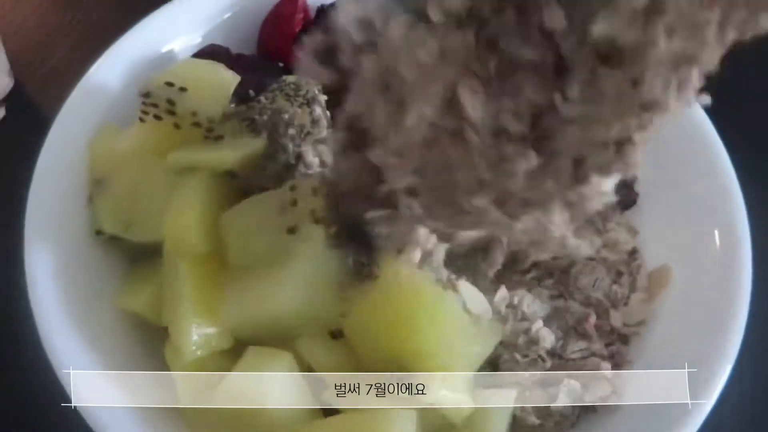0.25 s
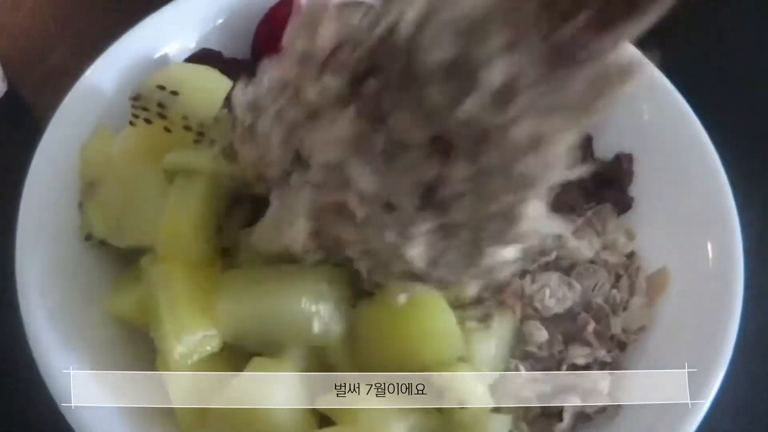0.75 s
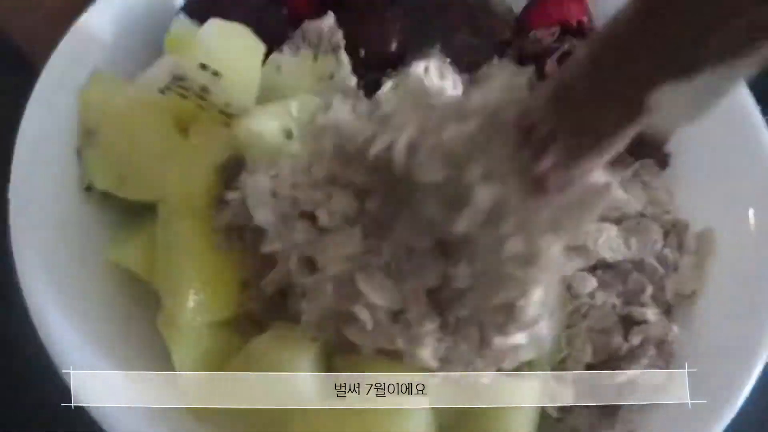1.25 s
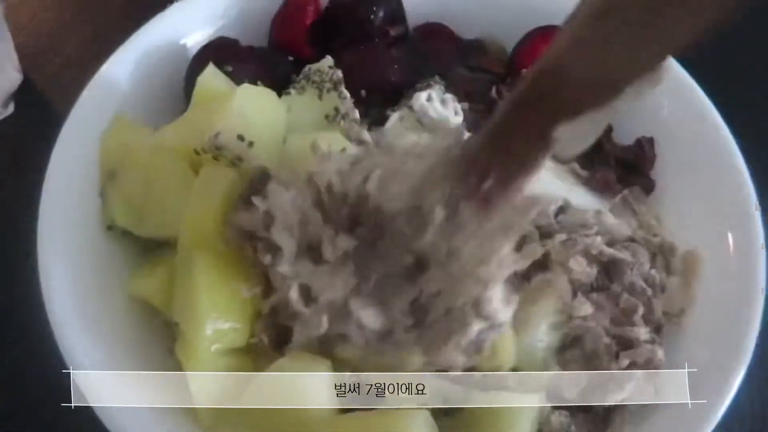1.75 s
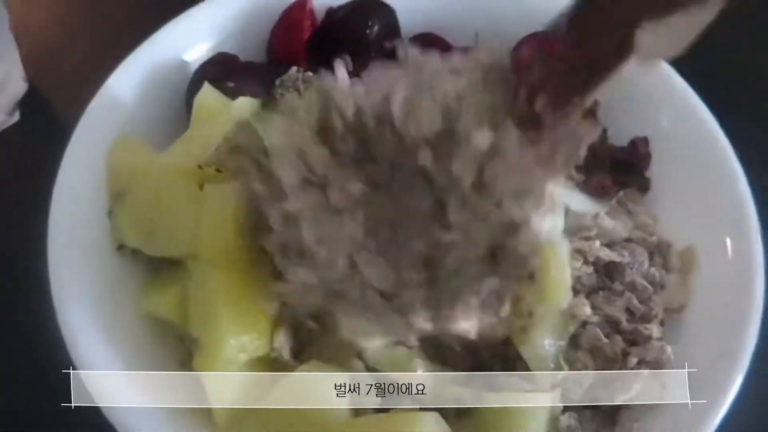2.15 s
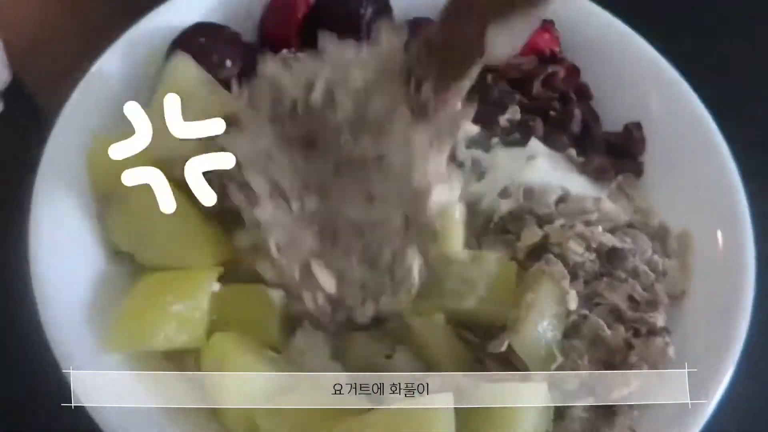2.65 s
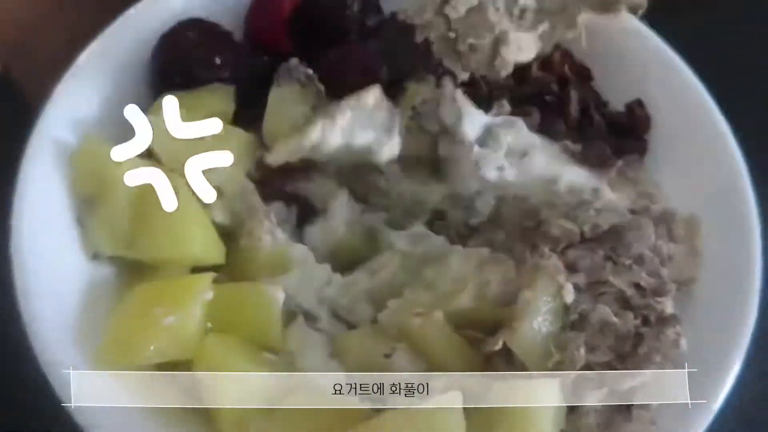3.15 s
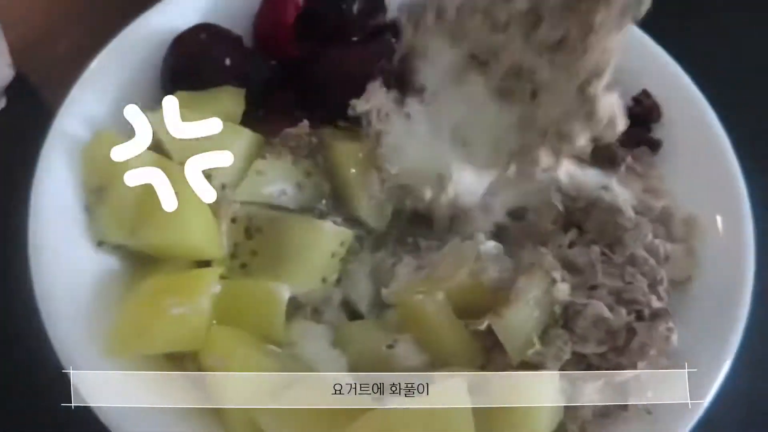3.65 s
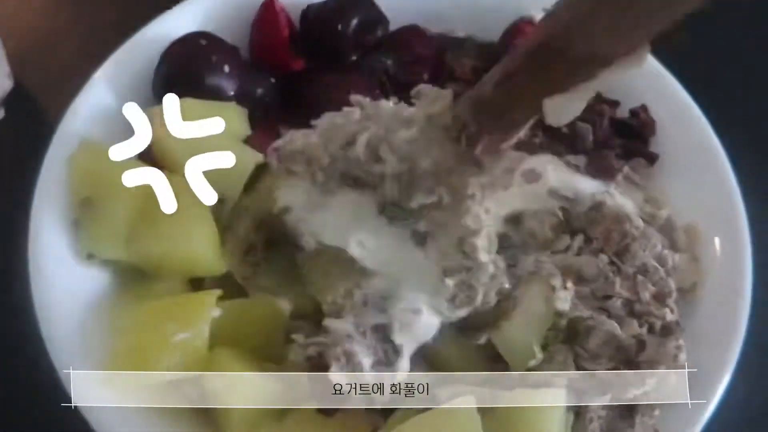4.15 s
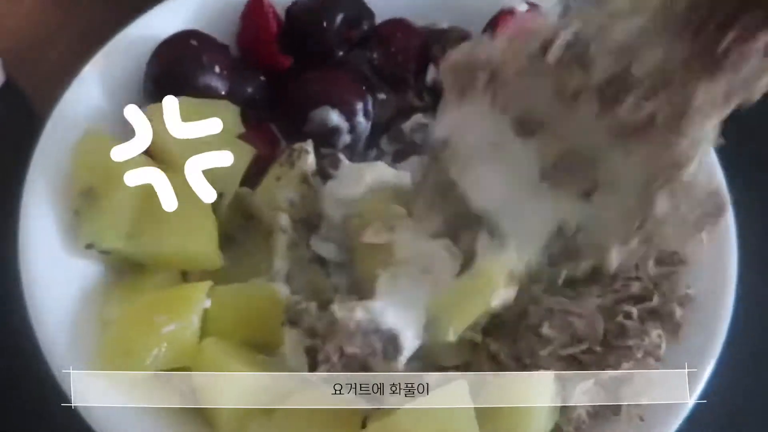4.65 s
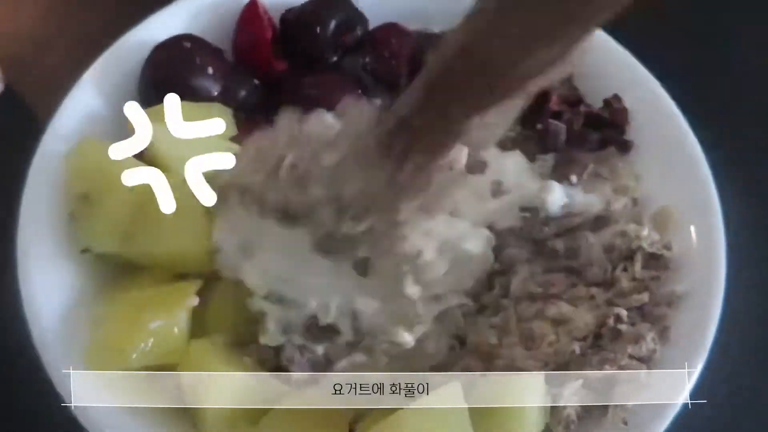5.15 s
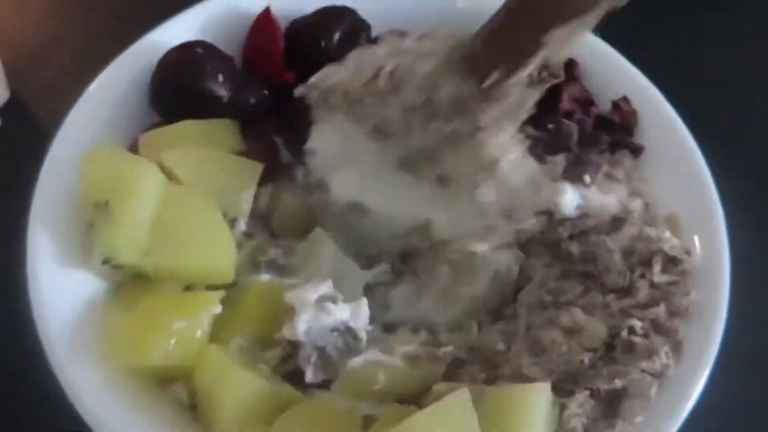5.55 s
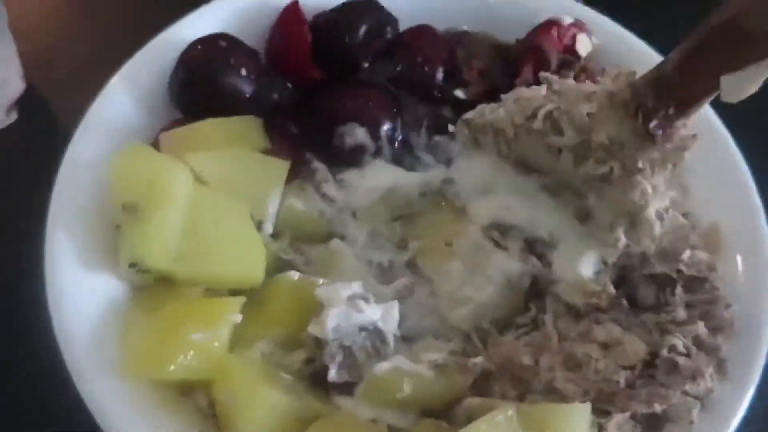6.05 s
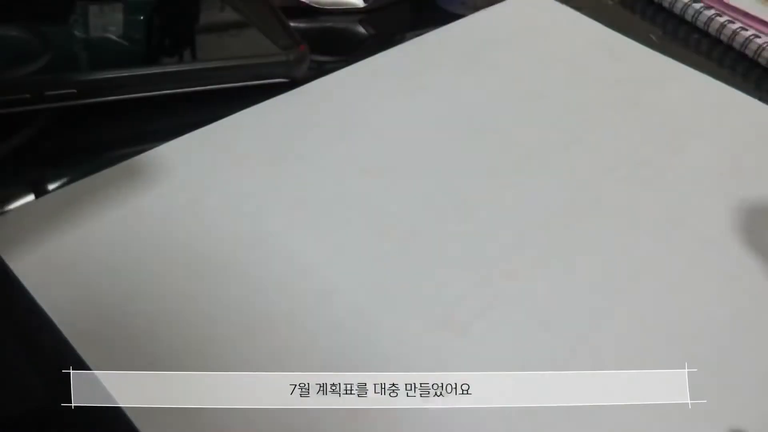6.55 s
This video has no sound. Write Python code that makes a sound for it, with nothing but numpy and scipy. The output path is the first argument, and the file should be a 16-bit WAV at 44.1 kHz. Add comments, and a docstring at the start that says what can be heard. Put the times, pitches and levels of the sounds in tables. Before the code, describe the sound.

Spoon crunches dry flakes in a ceramic bowl with knocks and a low hum, then jumps to rapid sped-up crackling before a near-silent desk.

```python
"""Stirring dry cereal into yoghurt

A wooden spoon folds dry flakes into yoghurt and fruit in a ceramic bowl: clumped noise grains crunch, short
wavelets snap, and knocks click, ring the bowl and thud on the table. A small kitchen adds echo, noise and hum.
The second stretch plays at triple speed, a high, quick patter; then a cut to a quiet desk with a whine and a tap."""
import sys
import numpy as np
from scipy import signal
from scipy.fft import rfft, irfft, next_fast_len
from scipy.io import wavfile
from scipy.ndimage import uniform_filter1d

SR = 44100
rng = np.random.default_rng(int(sys.argv[2]) if len(sys.argv) > 2 else 0)


def log_audio(samples):
    """Write samples as a 16-bit WAV file to the path given in sys.argv[1]."""
    # one column per channel
    frames = np.atleast_2d(samples).T
    # limit to full scale, then quantise
    limited = np.clip(frames, -1, 1)
    pcm = np.round(limited * 32767).astype(np.int16)
    wavfile.write(sys.argv[1], SR, pcm)


N = 300313
TIME = np.arange(N) / SR  # seconds
AGE = TIME[:SR // 2]  # seconds since a sound began, for half a second
TOP_HZ = 16000

# Spoon strokes; they differ in treble, some bright, some dull.
# Each row: middle in seconds, level in dB before its swell is rounded, treble in dB before a common lift.
STROKES = [(-0.01, -43.5, -3.5), (0.11, -53, 4.5), (0.37, -39, 3), (0.8, -41, 4), (1.225, -42, 1),
           (1.595, -39, -1.5), (1.935, -47, 1), (2.278, -44.5, 5.5), (2.52, -47, -1), (2.63, -49.5, 7),
           (2.76, -48, 1.5), (2.892, -35, 2), (3.004, -40, -6.5), (3.203, -43, -12), (3.294, -46.5, 9),
           (3.451, -32, 8), (3.572, -44, 6), (3.666, -39.5, -5.5), (3.782, -47, -5), (3.902, -36, 13.5),
           (4.008, -46, -11), (4.096, -38, -22), (4.204, -45, -6), (4.31, -35.5, -3), (4.426, -34.5, -1.5),
           (4.536, -36, -9), (4.655, -34, 4.5), (4.772, -37.5, -10), (4.885, -41, 6), (5.006, -40, -12),
           (5.123, -44.5, -10), (5.262, -44, 1), (5.487, -44, -23), (5.588, -35.5, -11),
           (5.753, -35.5, -19), (5.87, -38, -15), (5.978, -39, -5)]
# The tone of crunching flakes at natural speed. Each row: frequency in Hz, level in dB per Hz.
FLAKES = [(60, -33), (130, -1), (250, -5.5), (365, 1.5), (520, -12.5), (700, -14.5), (1100, -11),
          (1500, -7), (2400, -10.5), (3060, -15), (5600, -21), (10000, -36), (16000, -47.5)]
# Every stroke has one shape at natural speed: rise 20 dB, hold while the spoon ploughs, fall 20 dB.
STROKE_RISE_S, STROKE_HOLD_S, STROKE_FALL_S = 0.048, 0.039, 0.057


def undb(db):
    """Turn decibels into a gain."""
    return 10 ** (np.asarray(db) / 20)


def unit(x):
    """Scale to rms 1."""
    return x / np.sqrt(np.mean(x ** 2))


def peak(x, db):
    """Scale to a peak level in dB."""
    return x * undb(db) / np.abs(x).max()


def add(track, s, sound):
    """Mix a sound into the track at a time in seconds."""
    i = max(int(s * SR), 0)
    track[i:i + len(sound)] += sound[:max(N - i, 0)]


def colour(x, spectrum, speed=1):
    """Filter by a (Hz, dB) spectrum, shifted up with the playback speed."""
    hz, db = np.transpose(spectrum)
    length = x.shape[-1]
    size = next_fast_len(length)
    f = np.maximum(np.fft.rfftfreq(size, 1 / SR), 1)
    gain = undb(np.interp(np.log(f), np.log(hz * speed), db))
    return irfft(rfft(x, size) * gain, size)[..., :length]


def fade(t60):
    """Die away exponentially, by 60 dB in t60 seconds."""
    return np.exp(-np.log(1000) * AGE / t60)


def ring(hz, t60):
    """One way a struck object vibrates: a sine that dies away."""
    return np.sin(2 * np.pi * hz * AGE) * fade(t60)


def click(hz, cycles):
    """A heavily damped wavelet that swells and dies within a few cycles."""
    turn = AGE * hz
    return np.sin(2 * np.pi * turn) * turn * np.exp(-turn / cycles)


def during(table, start, end):
    """The rows of a table that fall in a stretch."""
    return [row for row in table if start <= row[0] < end]


def between(start, end):
    """A gate that is open from one cut to the next, with softened edges."""
    return uniform_filter1d(1. * ((TIME >= start) & (TIME < end)), size=128)


def crunch(start, end, speed, roundness=0.15, bright_hz=3000, bright_lift_db=5, settle_db=-57):
    """The crackle swells, holds and dies as the spoon ploughs through; strokes differ in treble."""
    flakes = crackle(speed)
    # the heap keeps settling between strokes
    out = flakes * undb(settle_db) * (TIME < STROKES[-1][0])
    hz = np.transpose(FLAKES)[0]
    treble = hz ** 2 / (hz ** 2 + bright_hz ** 2)
    for s, db, bright_db in during(STROKES, start - STROKE_HOLD_S, end):
        near = slice(max(int((s - .3) * SR), 0), int((s + .3) * SR))
        since = (TIME[near] - s) * speed
        slope_s = np.where(since < 0, STROKE_RISE_S, STROKE_FALL_S)
        outside = np.maximum(np.abs(since) - STROKE_HOLD_S / 2, 0) / slope_s
        swell_db = db - 20 * np.hypot(outside, roundness)
        # each stroke takes its own piece of the crackle
        spoonful = np.roll(flakes, rng.integers(N))[:len(since)]
        brightness = np.c_[hz, (bright_db + bright_lift_db) * treble]
        out[near] += colour(spoonful, brightness, speed) * undb(swell_db)
    return out


def crackle(speed, grains_per_s=450, spread_db=4, rub=0.8, clump_db=4.0, clump_s=.011):
    """Flakes of every size scrape and tick: each band has its own grains, which come in clumps."""
    out = np.zeros(N)
    for hz in 100 * 2 ** np.arange(0, 7.5, .5):  # half-octave bands
        if hz * speed < TOP_HZ * 1.1:
            sizes = rng.standard_normal(N) * undb(spread_db * np.minimum(rng.exponential(size=N), 2))
            ticks = unit(sizes * (rng.random(N) < grains_per_s * speed / SR))
            grains = ticks + rub * rng.standard_normal(N)  # steady noise is the scrape
            clumps = np.interp(TIME * speed / clump_s, np.arange(8192), rng.standard_normal(8192))
            edges = np.minimum(hz * speed * 2 ** np.array([-.25, .25]), .48 * SR)
            band = signal.butter(2, edges, "band", fs=SR, output="sos")
            out += signal.sosfilt(band, grains * undb(clump_db * clumps))
    return unit(colour(out, FLAKES, speed))


def snaps(start, end, speed, cycles=0.43, upper_db=-8, upper_ratio=2.0, splinter_db=-9,
          splinter_t60=0.028, gain_db=-1):
    """A flake cracks and rings briefly in two modes, with a short spray of splinters."""
    # Single flakes snapping, loud and soft.
    # Each row: time in seconds, peak in dB before the common gain, pitch in Hz as played.
    timed_snaps = [(0.4089, -40, 4200), (1.8923, -34, 2730), (2.2068, -31.5, 4800), (2.2509, -23.5, 3400),
                   (2.2682, -40, 2970), (2.4202, -31, 5560), (2.5731, -23.5, 8050), (2.7324, -19.5, 6100),
                   (2.7517, -19.5, 5600), (2.8565, -27, 10300), (3.2654, -25, 5830), (3.2906, -21, 7600),
                   (3.3288, -17, 6660), (3.3553, -11, 6340), (3.4555, -24, 5500), (3.5741, -25, 7900),
                   (3.6703, -24, 5500), (4.296, -36, 7000), (4.3709, -24.5, 7100), (4.4092, -41, 5000),
                   (4.5297, -16, 6860), (4.5788, -22, 4300), (4.6576, -13, 6700), (4.684, -19.5, 6460),
                   (4.8775, -23.5, 5000), (4.9388, -31.5, 5950), (5.0005, -24.5, 5000),
                   (5.0095, -22, 11200), (5.0586, -32, 5830), (5.1143, -24, 4670), (5.476, -27, 5970),
                   (5.5776, -19.5, 6300), (5.6909, -19, 6400), (5.9776, -19.5, 6300)]
    out = np.zeros(N)
    for s, db, hz in during(timed_snaps, start, end) + faint_snaps(start, end, speed):
        upper = peak(click(min(hz * upper_ratio, TOP_HZ * .9), 2 * cycles), upper_db)
        flake = peak(click(hz, cycles), 0) + upper
        splinters = rng.standard_normal(len(AGE)) * fade(splinter_t60 / speed)
        splinters = signal.fftconvolve(splinters, flake[:256])[:len(AGE)]
        snap = peak(flake, 0) + peak(splinters, splinter_db)
        add(out, s - .0001, peak(snap, db + gain_db))
    return out


def faint_snaps(start, end, speed, scatter_s=0.027, db=-35, flake_hz=2300, spread_octaves=.3):
    """Each stroke breaks one more small flake somewhere on its way: rows like those of the timed snaps."""
    strokes = during(STROKES, start, end)
    chance = rng.standard_normal((len(strokes), 2))
    return [(s + when * scatter_s / speed, db, flake_hz * speed * 2 ** (pitch * spread_octaves))
            for (s, _, _), (when, pitch) in zip(strokes, chance)]


def knocks(start, end, speed, ring_db=1, push_s=0.0019, thud_db=-1, thud_hz=92, thud_cycles=0.68,
           crush_db=-21, crush_t60=0.017, top_db=-9, top_t60=0.21, scatter_db=1.2, click_decay_s=0.00039):
    """Wood clicks on ceramic and crushes a few flakes; the bowl rings briefly and the table thuds."""
    # Spoon meets bowl; the click level is its peak, ring and thud are peaks before a common gain.
    # Each row: time in seconds, click level in dB, bowl ring level in dB, table thud level in dB,
    # click pitch in Hz as played.
    blows = [(1.6275, -1, -13.5, -37, 1566), (1.6402, -12.5, -33, -44.5, 1700),
             (1.9645, -56, -21.5, -36, 1390), (2.3042, -16, -13, -30.5, 2170),
             (2.527, -46, -36, -45.5, 4900), (2.77, -47, -40, -40, 5800), (2.8932, -3.5, -20, -29.5, 4450),
             (3.1963, -27, -42, -39.5, 4640), (3.3515, -32, -35.5, -30, 5900),
             (3.4515, -13.5, -31, -25, 5400), (3.4533, -15, -26.5, -29, 3400),
             (3.8972, -4.5, -17, -31.5, 6800), (3.8976, -9, -34, -35.5, 3500),
             (4.004, -28.5, -33.5, -31, 3900), (4.3112, -30, -49, -36, 5800),
             (4.43, -11.5, -24.5, -34, 4100), (4.543, -23, -27, -39.5, 4200),
             (4.6553, -16.5, -28.5, -35, 3580), (4.7675, -32, -27, -33, 4600), (5.128, -34, -39, -49, 4640),
             (5.2557, -32, -31.5, -39, 5760), (5.763, -22, -29.5, -29, 3480), (5.975, -38, -35, -46, 5100)]
    # The full bowl's modes on the table, at natural speed.
    # Each row: frequency in Hz, relative level in dB before scatter, time to fall 60 dB in seconds.
    bowl_modes = [(283.6, -11, 0.28), (348.5, -13, 0.24), (358, 4.5, 0.085), (425, -6.5, 0.15),
                  (470, -17.5, .2), (550, -24, .15), (721, -16, 0.094)]
    # The table top's dense, dull ring at natural speed. Each row: frequency in Hz, level in dB per Hz.
    table_top = [(50, -29.5), (90, -6.5), (150, -11.5), (220, -23.5), (275, -10.5), (350, -4), (470, 0.5),
                 (600, -16), (1100, -13), (2000, -31.5), (4000, -62)]
    out = np.zeros(N)
    push = 1 - np.exp(-AGE * speed / push_s)  # the food cushions the blow
    for s, contact_db, bowl_db, table_db, hz in during(blows, start, end):
        bowl = np.zeros(len(AGE))
        for mode_hz, db, t60 in bowl_modes:
            # the spoon lands on a new spot each time and weights the modes anew
            strength = undb(db + scatter_db * rng.standard_normal())
            bowl += strength * ring(mode_hz * speed, t60 / speed)
        top = colour(rng.standard_normal(len(AGE)), table_top, speed) * fade(top_t60 / speed)
        crush = colour(rng.standard_normal(len(AGE)), FLAKES, speed) * fade(crush_t60 / speed)
        # wood on ceramic dies equally fast whatever its pitch
        contact = click(hz, hz * click_decay_s / speed)
        add(out, s - 0.00031 / speed, peak(contact, contact_db) + peak(crush, contact_db + crush_db))
        add(out, s, peak(bowl * push, bowl_db + ring_db) + peak(top * push, bowl_db + top_db))
        add(out, s, peak(click(thud_hz * speed, thud_cycles), table_db + thud_db))
    # a small bowl radiates no deep bass
    return signal.sosfilt(signal.butter(4, 52 * speed, "high", fs=SR, output="sos"), out)


def bump():
    """The hand-held microphone takes one soft, deep bump: a low, damped wavelet."""
    out = np.zeros(N)
    add(out, 1.123, peak(click(hz=54.7, cycles=0.53), db=-30.5))
    return out


def desk():
    """A quiet room: noise, a steady thin electrical whine and one light tap made of two wavelets."""
    # The thin electrical whine. Each row: frequency in Hz, level in dB rms.
    whine_tones = [(8145, -94)]
    # Room noise at the desk. Each row: frequency in Hz, level in dB per Hz.
    desk_spectrum = [(24, -65), (40, -49), (204, -5.5), (329, -10), (382, -2), (1520, -19), (2840, -20),
                     (6490, -23.5), (8340, -24.5), (8990, -28), (16000, -35)]
    # Left-right difference of that noise. Each row: frequency in Hz, level in dB per Hz.
    desk_wide = [(24, -59.5), (40, -31), (663, 5), (3220, -9.5), (5440, -26.5), (10700, -20.5),
                 (16000, -24)]
    tap = np.zeros(N)
    add(tap, 6.7628, peak(click(hz=934, cycles=0.5), db=-40.5) + peak(click(hz=1900, cycles=0.33), db=-45))
    whine = sum(np.sqrt(2) * undb(db) * np.sin(2 * np.pi * hz * TIME) for hz, db in whine_tones)
    # the tap borrows the kitchen's echo, slightly stretched
    return kitchen(tap, 0.91, wet_db=-9) + whine + air(desk_spectrum, -67.5, desk_wide, wide_db=-80)


def kitchen(dry, speed, bass_t60=.5, t60=0.58, bass_hz=700, bass_db=-9, wet_db=-18.0, build_s=0.0071,
            wall_s=.0128, wall_db=-10, wall_hz=1100, side=.12, treble_side=0.013):
    """One near wall answers first; the small room's tail of fading noise is fuller in the bass."""
    noise = rng.standard_normal((2, len(AGE)))
    low = signal.sosfiltfilt(signal.butter(2, bass_hz * speed, fs=SR, output="sos"), noise)
    bass_tail = undb(bass_db) * low * fade(bass_t60 / speed)
    upper_tail = undb(wet_db) * (noise - low) * fade(t60 / speed)
    build_up = np.minimum(AGE * speed / build_s, 1)
    mid, wide = (bass_tail + upper_tail) * build_up / np.sqrt(np.sum(fade(t60 / speed) ** 2))
    wide = side * wide
    mid[0] += 1  # the direct sound
    dull = np.exp(-2 * np.pi * wall_hz * speed * AGE[:64])  # the wall swallows the treble
    arrival = int(wall_s / speed * SR)
    mid[arrival:arrival + len(dull)] += undb(wall_db) * dull / dull.sum()
    wide[:2] += [treble_side, -treble_side]  # left and right differ slightly in the treble
    return signal.fftconvolve(dry[None], np.array([mid + wide, mid - wide]), axes=1)[:, :N]


def hum(speed):
    """An appliance hums at the mains rate and near its fourth multiple: steady sines."""
    # Mains hum. Each row: frequency in Hz at natural speed, level in dB rms.
    hum_tones = [(49.55, -59), (200, -61)]
    return sum(np.sqrt(2) * undb(db) * np.sin(2 * np.pi * hz * speed * TIME) for hz, db in hum_tones)


def air(spectrum, db, wide_spectrum, wide_db, waver_db=1.34):
    """Room noise that wavers a little around its level, with a steady part that differs left and right."""
    knots = np.arange(0, 7, .07)  # seconds
    waver = np.interp(TIME, knots, rng.standard_normal(len(knots)))
    mid = undb(db + waver_db * waver) * unit(colour(rng.standard_normal(N), spectrum))
    wide = undb(wide_db) * unit(colour(rng.standard_normal(N), wide_spectrum))
    return np.array([mid + wide, mid - wide])


def scene():
    """Stirring at natural speed, then sped up, then the desk."""
    # Stretches of the stirring. Each row: start in seconds, end in seconds, playback speed (1 is natural).
    stretches = [(0, 2.44, 1), (2.44, 6.29, 3)]
    # Kitchen noise as played, natural and fast. Each row: frequency in Hz, level in dB per Hz.
    natural_air, fast_air = [(12, -45.5), (20, -24.5), (55, -13), (107, -3), (130, -14), (204, -12),
                             (277, -5), (558, -23), (607, -16), (660, -18), (802, -20.5), (1610, -25),
                             (3160, -28), (5680, -33), (16000, -47.5)], [(24, -56.5), (40, -35.5), (87, -12.5), (112, -16.5),
                                              (140, -15.5), (204, -2.5), (330, -8), (615, -4), (800, -5),
                                              (1760, -16), (3740, -19.5), (8000, -27), (16000, -29)]
    # Left-right difference of those two noises. Each row: frequency in Hz, level in dB per Hz.
    natural_wide, fast_wide = [(18, -51), (30, -15.5), (328, 2), (569, -6.5), (2540, -24), (3400, -29.5),
                               (3980, -52.5), (4420, -64.5), (16000, -52.5)], [(24, -57.5), (40, -17), (121, -31), (290, 2.5),
                                                     (1120, 5.5), (3220, -7.5), (3650, -59), (11000, -51),
                                                     (16000, -61)]
    out = bump() + desk() * between(6.32, N / SR)
    floors = (air(natural_air, -52.5, natural_wide, wide_db=-58.5),
              air(fast_air, -51, fast_wide, wide_db=-59.5))
    for (start, end, speed), floor in zip(stretches, floors):
        bowl = crunch(start, end, speed) + knocks(start, end, speed) + snaps(start, end, speed)
        out = out + (kitchen(bowl, speed) + floor + hum(speed)) * between(start, end)
    return out


def record(dry):
    """The recorder cuts the top: a steep low-pass filter."""
    return signal.sosfilt(signal.ellip(8, .2, 70, TOP_HZ, fs=SR, output="sos"), dry)


dry = scene()
out = record(dry)
log_audio(out)
```